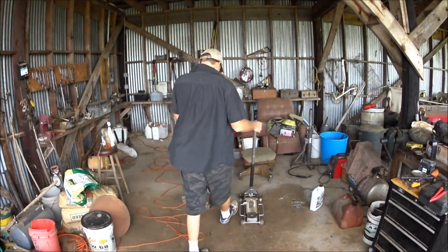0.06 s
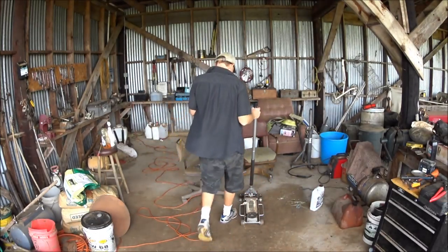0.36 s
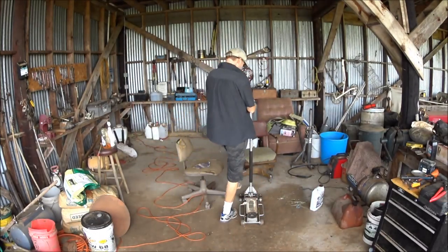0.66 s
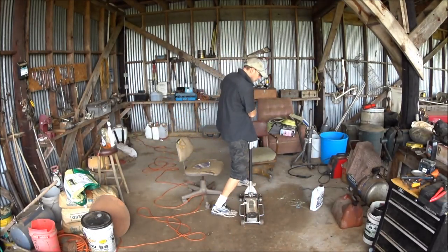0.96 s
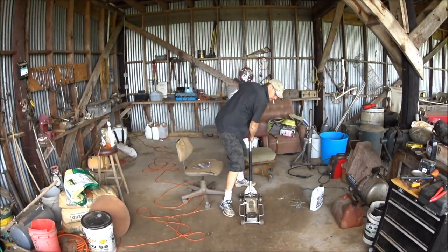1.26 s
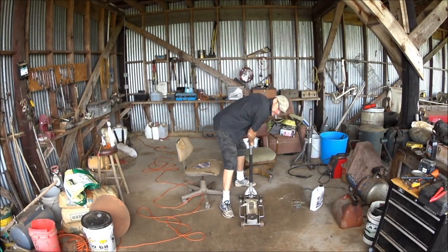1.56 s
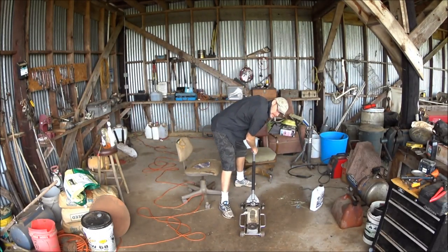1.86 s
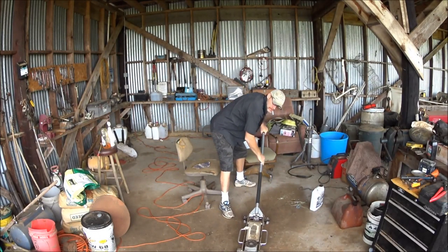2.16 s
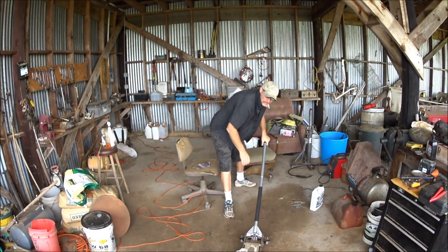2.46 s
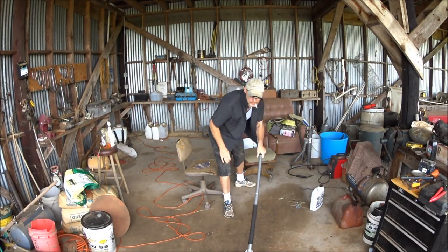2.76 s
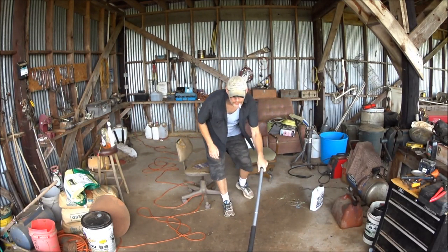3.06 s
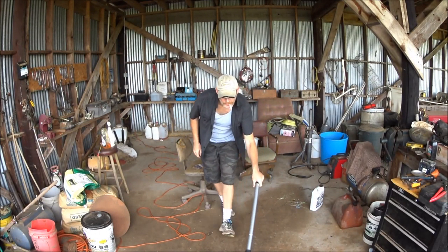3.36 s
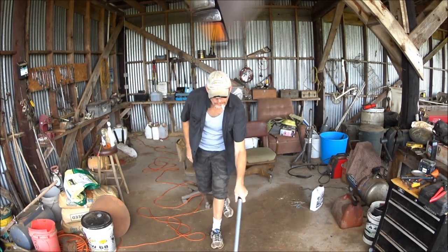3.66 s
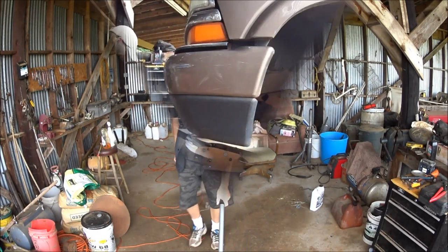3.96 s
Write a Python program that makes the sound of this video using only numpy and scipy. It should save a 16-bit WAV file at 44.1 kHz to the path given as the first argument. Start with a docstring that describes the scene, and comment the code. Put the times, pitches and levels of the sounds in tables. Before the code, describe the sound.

In a slightly echoing sheet-metal workshop, soft steps scuff the sandy floor. Then a floor jack is pulled toward the close microphone, its steel wheels chattering and crunching grit, with brief squeals, sharp clacks and a ringing metal rattle.

```python
"""Sheet-metal workshop: a man steps and scuffs over gritty concrete, then pulls a steel floor jack closer.
Its axles stick and slip in short squeals. The wheels chatter, crush grit and drone in the slab,
shaking the ringing frame, dry bearings and loose handle. The metal walls echo.
Outside, a bird calls faintly over quiet air."""
import sys
import numpy as np
from scipy import signal
from scipy.fft import rfft, irfft, next_fast_len
from scipy.io import wavfile
from scipy.ndimage import uniform_filter1d, minimum_filter1d, map_coordinates

SR = 44100
rng = np.random.default_rng(int(sys.argv[2]) if len(sys.argv) > 2 else 0)


def wrap_up_sound(samples):
    """Save the sound to the file named by the first command line argument, as 16-bit audio."""
    columns = np.atleast_2d(samples).T
    # keep every value between -1 and 1, then stretch to whole-number steps
    tamed = np.clip(columns, -1, 1)
    steps = np.round(tamed * 32767).astype(np.int16)
    wavfile.write(sys.argv[1], SR, steps)


N = 176400
TIME_S = np.arange(N) / SR


def rolling():
    """Steel wheels chatter, crush grit and thud on concrete; frame modes swell as the load shifts."""
    # time_s, chatter_db, grit_db
    roll_levels = [(1.57, -76.5, -97), (1.632, -67, -86), (1.64, -56, -52), (1.66, -44.5, -50),
                   (1.70, -45.5, -53), (1.745, -42, -47), (1.755, -31.5, -40.5), (1.84, -35.5, -53),
                   (1.86, -32.5, -39), (1.94, -34.5, -52), (1.95, -34, -33.5), (2.07, -29.5, -38.5),
                   (2.12, -25, -34), (2.25, -24, -30.5), (2.36, -23, -34), (2.45, -27.5, -36),
                   (2.66, -24.5, -35.5), (2.86, -25.5, -28.5), (2.92, -23.5, -35), (3.0, -26, -26.5),
                   (3.05, -22.5, -34), (3.16, -29, -31), (3.22, -22, -32), (3.28, -29.5, -34),
                   (3.38, -27.5, -32.5), (3.55, -27.5, -36.5), (3.64, -29, -39), (3.66, -25, -37),
                   (3.71, -25.5, -48), (3.745, -32, -48), (3.81, -28, -37), (3.865, -35.5, -56),
                   (3.917, -35, -38), (3.927, -29, -33), (3.955, -29.5, -41.5), (4.0, -40, -43.5)]
    # frame ring relative to chatter: time_s, gain_db
    ring_levels = [(1.64, -8), (2.3, -8.5), (2.6, -3), (2.9, -3.5), (3.7, -3), (4.0, -6)]
    # freq_hz, width_hz, gain_db
    frame_modes = [(576, 60, -7), (770, 20, -7), (1064, 26, 9), (1140, 55, 6), (1366, 25, 0), (1722, 26, 8),
                   (1905, 36, 4.5), (2168, 70, 1.5), (2304, 45, 2), (5042, 50, -4), (6250, 38, -6)]
    # spectra: freq_hz, gain_db
    chassis_spectrum = [(40, -69), (120, -45), (190, -26), (260, -26), (350, -13.5), (480, -16.5),
                        (640, -3), (705, -7), (780, -1.5), (1000, -3), (1180, -1), (1550, -0.5),
                        (2300, -0.5), (2600, -1.5), (3300, -5), (4400, -4), (5600, -11.5), (7500, -49),
                        (11000, -44)]
    grit_spectrum = [(500, -28), (2500, 3.5), (5000, 3), (6400, 2), (7200, -2.5), (9000, -5.5),
                     (10300, -10), (11000, -16)]
    thud_spectrum = [(15, -6.5), (35, 4.5), (70, -8), (130, 15), (300, -94), (1000, -70)]
    chatter_gain, grit_gain = levels(roll_levels)
    ring_gain, = levels(ring_levels)
    contacts_per_s, contact_spread_db = 3000, 3.5
    jolts = amp(wobble(per_s=70))
    blows = impacts(contacts_per_s, contact_spread_db) * jolts
    body = amp(1.5) * patchy(coloured(blows, chassis_spectrum))
    shake = impacts(contacts_per_s, contact_spread_db) * jolts
    modes = sum(amp(db + 1.5 * wobble(per_s=7)) * ringing(shake, [(hz, width_hz, 0)])
                for hz, width_hz, db in frame_modes)
    frame = ring_gain * unit(modes)
    bumps = impacts(per_s=120, spread_db=4) * amp(5 * wobble(per_s=12))
    thuds = amp(-60) * coloured(bumps, thud_spectrum)
    cracks = impacts(per_s=2500, spread_db=-0.5) * jolts * amp(wobble(per_s=22))
    grit = amp(2) * patchy(coloured(cracks, grit_spectrum))
    return chatter_gain * (body + frame + thuds) + grit_gain * grit


def patchy(x, depth_db=2.1):
    """Colour shifts in short patches as the wheels meet rougher and smoother concrete."""
    spectra = signal.stft(x, nperseg=512)[2]
    patches = uniform_filter1d(rng.standard_normal(spectra.shape), size=7, axis=0)
    patches = uniform_filter1d(patches, size=10, axis=1)
    return unit(signal.istft(spectra * amp(depth_db * unit(patches)), nperseg=512)[1][:N])


def squeals():
    """Dry axles stick and slip: a wavering tone and a rasp at one pitch, each with a weak octave. The 2875 Hz
    row at 1.946 s is the loose handle's tonal clink."""
    # start_s, length_s, pitch_hz, level_db
    slips = [(1.588, 0.05, 4940, -66.5), (1.641, .013, 4780, -39), (1.657, .015, 4310, -21.5),
             (1.679, 0.0056, 4195, -21.5), (1.685, 0.024, 4270, -35.5), (1.946, 0.013, 2875, -23.5),
             (1.945, 0.013, 3480, -24.5), (1.953, 0.068, 4156, -25), (1.957, 0.11, 3670, -27.5),
             (2.052, .012, 4205, -18.5), (2.066, 0.044, 4170, -29.5), (2.16, 0.054, 4480, -28),
             (2.425, 0.044, 4165, -23.5), (2.43, .06, 3634, -27.5), (3.28, 0.044, 3980, -26),
             (3.347, 0.024, 7530, -30.5), (3.352, 0.059, 3760, -22.5), (3.429, 0.013, 4510, -23.5)]
    edge_s, octave_db, rasp_db = 0.0027, -19.5, -4
    tone_waver, rasp_waver = 0.022, 0.055  # shares of the pitch
    out = np.zeros(N)
    for waver, share_db in ((tone_waver, 0), (rasp_waver, rasp_db)):
        drift = wobble(per_s=810)
        grip = unit(amp(3.5 * wobble(per_s=280)))
        for start_s, length_s, pitch_hz, level_db in slips:
            end_s = start_s + length_s + edge_s
            span = np.flatnonzero((TIME_S > start_s) & (TIME_S < end_s))
            shifted = span - rng.integers(SR)  # own stretch of drift and grip
            gate = np.clip(np.minimum(TIME_S[span] - start_s, end_s - TIME_S[span]) / edge_s, 0, 1)
            hz = pitch_hz * (1 + waver * drift[shifted])
            phase = 2 * np.pi * (rng.random() + np.cumsum(hz) / SR)
            tone = np.sin(phase) + amp(octave_db) * np.sin(2 * phase)
            out[span] += amp(level_db + share_db) * gate * unit(grip[shifted] * tone)
    return out / np.hypot(1, amp(rasp_db))


def clacks():
    """The jack knocks on the floor and cracks grit."""
    # start_s, peak_db, centre_hz, width_octaves, t60_s
    knocks = [(1.637, -45, 3500, 1.2, .012), (1.947, -15, 3740, .3, .06), (2.403, -14, 3000, 0.54, 0.015),
              (3.023, -25, 7100, 0.17, .012), (3.431, -13, 3300, 0.43, 0.02),
              (3.825, -23, 7960, 0.24, 0.019), (3.927, -26, 1800, 0.96, 0.022)]
    return clicks(knocks)


def handle():
    """The loose handle clinks in its socket."""
    # time_s, level_db
    rattle_levels = [(1.72, -65), (1.79, -42), (1.93, -43), (1.95, -35), (2.4, -33), (2.72, -32.5),
                     (2.82, -48), (4.0, -54)]
    # freq_hz, width_hz, gain_db
    handle_modes = [(2882, 45, 14), (4570, 96, -2)]
    gain, = levels(rattle_levels)
    return gain * ringing(impacts(per_s=700, spread_db=3), handle_modes)


def bearings():
    """Dry bearing balls jingle in high spurts, each pitch flaring on its own."""
    # time_s, level_db
    jingle_levels = [(1.94, -51), (2.14, -60), (2.19, -44.5), (2.38, -40), (2.44, -49), (2.56, -68),
                     (2.72, -45), (3.06, -42.5), (3.16, -47), (3.36, -45), (3.6, -45.5), (3.7, -70),
                     (4.0, -57)]
    # freq_hz, width_hz, gain_db
    ball_modes = [(9650, 260, -3), (10000, 200, 0), (10270, 180, 1), (10520, 180, -1)]
    gain, = levels(jingle_levels)
    jingle = np.zeros(N)
    for hz, width_hz, db in ball_modes:
        spurts = amp(db + 5 * wobble(per_s=30))
        jingle += spurts * ringing(impacts(per_s=450, spread_db=3), [(hz, width_hz, 0)])
    return gain * unit(jingle)


def growl():
    """Loaded wheels drone in the concrete even at a crawl."""
    # time_s, level_db
    growl_levels = [(1.63, -61.5), (1.70, -58), (1.9, -54.5), (2.1, -60), (2.6, -54.5), (2.9, -53),
                    (3.5, -54), (3.94, -54.5), (4.0, -50)]
    # applied twice: freq_hz, width_hz, gain_db
    slab_modes = [(125.7, 26, -7), (195, 48, -8), (344, 110, -4), (403, 96, -2)]
    gain, = levels(growl_levels)
    slab = ringing(impacts(per_s=840, spread_db=2.5), slab_modes)
    return gain * ringing(slab, slab_modes)


def scuffs():
    """Soles drag sand over the floor; each stroke rises and falls 20 dB in its given times."""
    # peak_s, rise_s, fall_s, level_db, treble_db_per_octave
    strokes = [(.12, 0.26, 0.19, -61.5, 4.5), (.27, 0.059, 0.099, -64.5, 5),
               (.355, 0.075, 0.042, -59.5, 0.5), (.67, 0.12, 0.04, -65, -9), (.86, 0.034, 0.094, -57.5, 4),
               (.92, 0.047, 0.096, -51, 6.5), (.975, 0.11, 0.13, -49, 3), (1.12, 0.11, 0.12, -57.5, -5.5),
               (1.19, .03, 0.048, -63, 8), (1.355, .04, 0.062, -61, -1.5)]
    # freq_hz, gain_db
    sole_spectrum = [(40, -40), (75, -30), (120, -16), (200, -15), (400, -1.5), (1400, 5), (2500, -2),
                     (3800, 0), (6500, -9), (11000, -23.5)]
    sand = coloured(impacts(per_s=6300, spread_db=6), sole_spectrum)
    out = np.zeros(N)
    for peak_s, rise_s, fall_s, level_db, tilt_db in strokes:
        stroke = unit(filtered(sand, lambda hz: amp(tilt_db * np.log2(1 + hz / 1000))))
        fade_db = 20 * np.maximum((peak_s - TIME_S) / rise_s, (TIME_S - peak_s) / fall_s)
        out += stroke * amp(level_db - fade_db)
    return out


def steps():
    """Heels land and single grains snap."""
    # start_s, peak_db, centre_hz, width_octaves, t60_s
    taps = [(0.126, -45, 2490, 0.6, 0.0051), (.173, -42, 1940, 0.88, 0.021), (.240, -46, 1280, 0.75, 0.014),
            (0.239, -52, 460, 0.4, 0.18), (.246, -44, 4140, 0.47, 0.0069),
            (0.345, -42.5, 3820, 0.47, 0.017), (0.372, -39, 6000, 1.2, 0.0083),
            (0.656, -60, 1000, 0.4, 0.17), (0.822, -49.5, 1600, .8, 0.26), (.962, -35, 3800, 0.79, .005),
            (1.079, -79, 119, 0.27, 0.41), (1.18, -46, 3000, 1.2, 0.0066)]
    return clicks(taps)


def bird(waver=0.026):
    """A distant bird whistles a few gliding notes."""
    # start_s, length_s, first_hz, last_hz, rms_db
    whistles = [(0.572, 0.065, 3100, 3240, -73.5), (0.614, 0.039, 2800, 2140, -75),
                (0.649, 0.041, 1420, 1300, -70), (.735, 0.067, 2560, 2600, -81),
                (.77, 0.055, 2950, 3400, -79)]
    out = np.zeros(N)
    for start_s, length_s, first_hz, last_hz, rms_db in whistles:
        progress = np.clip((TIME_S - start_s) / length_s, 0, 1)
        hz = (first_hz + (last_hz - first_hz) * progress) * (1 + waver * wobble(per_s=300))
        swell = 2 * amp(rms_db) * np.sin(np.pi * progress)
        out += swell * np.sin(2 * np.pi * np.cumsum(hz) / SR)
    return out


def wall_echoes(x, wet_db=-7, crossfades=12):
    """Metal walls echo in stereo; random tails crossfade as the source moves."""
    # freq_hz, t60_s
    decay_times = [(150, 0.25), (1000, 0.33), (4000, 0.38), (10000, 0.28)]
    # freq_hz, side_over_mid_db
    echo_width = [(40, -16), (150, -12), (450, -9), (1100, -0.5), (2000, -3), (4200, -8), (9000, -3)]
    wet = np.zeros((2, N))
    for k in range(crossfades + 1):
        hz, age_s, spectra = signal.stft(rng.standard_normal((2, SR // 3)), SR, nperseg=256)
        decay = amp(-60 * age_s / along(decay_times, hz)[:, None])
        tail = signal.istft(spectra * decay, SR, nperseg=256)[1]
        tail /= np.linalg.norm(tail[0])
        share = np.sqrt(np.clip(1 - abs(np.arange(N) * crossfades / N - k), 0, 1))
        wet += signal.oaconvolve((x * share)[None], tail, axes=1)[:, :N]
    mid = x + amp(wet_db) * wet[0]
    side = amp(wet_db) * filtered(wet[1], lambda hz: amp(along(echo_width, hz)))
    return np.array([mid + side, mid - side]) / np.hypot(1, amp(wet_db))


def air():
    """Quiet outdoor air, widest in the low middle."""
    # freq_hz, gain_db
    air_spectrum = [(30, -26), (70, -15), (120, -19), (200, -7), (400, -3.5), (900, 0.5), (1500, -3.5),
                    (2200, -3), (4000, -8.5), (7000, -12), (11000, -11)]
    # freq_hz, side_over_mid_db
    air_width = [(100, -8), (400, 3.5), (1000, 2.5), (2500, -2), (5000, -5), (11000, -8)]
    mid, side = (coloured(rng.standard_normal(N), air_spectrum) for _ in range(2))
    side = filtered(side, lambda hz: amp(along(air_width, hz)))
    return amp(-69) * np.array([mid + side, mid - side])


def clicks(rows):
    """Dead clicks: decaying, band-limited noise bursts."""
    out = np.zeros(N)
    for start_s, peak_db, centre_hz, width_octaves, t60_s in rows:
        decay = (TIME_S >= start_s) * amp(-60 * np.clip((TIME_S - start_s) / t60_s, 0, 3))
        burst = rng.standard_normal(N) * decay
        click = filtered(burst, lambda hz: 1 / (1 + (np.log2((hz + 1) / centre_hz) / width_octaves) ** 4))
        out += amp(peak_db) * click / abs(click).max()
    return out


def impacts(per_s, spread_db):
    """Random tiny blows of uneven size."""
    size = amp(spread_db * np.clip(rng.standard_normal(N), -2, 2))
    return (rng.random(N) < per_s / SR) * size * rng.choice([-1, 1], N)


def ringing(x, modes):
    """x through parallel resonances, at rms 1."""
    def response(hz):
        return sum(amp(db) * 1j * hz * width_hz / (mode_hz ** 2 - hz ** 2 + 1j * hz * width_hz)
                   for mode_hz, width_hz, db in modes)
    return unit(filtered(x, response))


def coloured(x, spectrum):
    """x shaped by a spectrum, at rms 1."""
    return unit(filtered(x, lambda hz: amp(along(spectrum, hz))))


def filtered(x, response):
    """x through a frequency response."""
    size = next_fast_len(N + SR // 4)
    return irfft(rfft(x, size) * response(np.fft.rfftfreq(size, 1 / SR)), size)[..., :N]


def wobble(per_s):
    """Smooth curve through random knots."""
    return map_coordinates(rng.standard_normal(N // 8), [TIME_S * per_s], mode="wrap")


def levels(rows):
    """Gain per sample for each dB column, silent before the first row."""
    times_s, *columns_db = np.transpose(rows)
    return [amp(np.interp(TIME_S, times_s, db)) * (TIME_S > times_s[0]) for db in columns_db]


def along(points, hz):
    """Interpolate on a log frequency axis."""
    knots_hz, values = np.transpose(points)
    return np.interp(np.log(hz + 1), np.log(knots_hz + 1), values)


def unit(x):
    """Scale to rms 1."""
    return x / np.sqrt(np.mean(x ** 2) + 1e-20)


def amp(db):
    """Decibels to gain."""
    return 10 ** (np.asarray(db) / 20)


def scene():
    """Jack, feet, bird and air at a close microphone pair."""
    # freq_hz, left_lead_rad
    phase_lead = [(80, 0.17), (450, 0.56), (1050, 0.071), (1800, 0), (4000, 0.31), (9000, 0.07)]
    pan_db = 0.35
    sources = rolling() + growl() + bearings() + handle() + squeals()
    sources = sources + scuffs() + steps() + clacks() + bird()
    room = wall_echoes(sources) + air()
    pair = filtered(room, lambda hz: np.exp(0.5j * np.outer([1, -1], along(phase_lead, hz))))
    return pair * amp([[pan_db], [-pan_db]])


def record(dry):
    """Peak limiter, then a steep low-pass."""
    limit_db, hold_s, top_hz, edge_hz = -12, 0.0013, 11120, 150
    hold = int(hold_s * SR)
    needed_gain = np.minimum(1, amp(limit_db) / (abs(dry).max(axis=0) + 1e-9))
    limited = dry * uniform_filter1d(minimum_filter1d(needed_gain, hold), hold)
    return filtered(limited, lambda hz: np.clip((top_hz - hz) / edge_hz, 0, 1))


dry = scene()
out = record(dry)
wrap_up_sound(out)
```